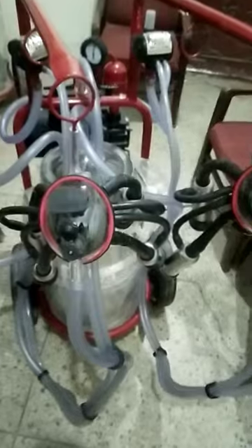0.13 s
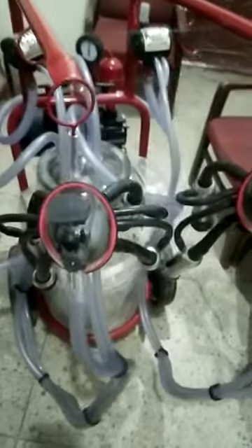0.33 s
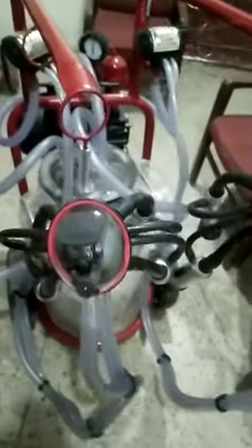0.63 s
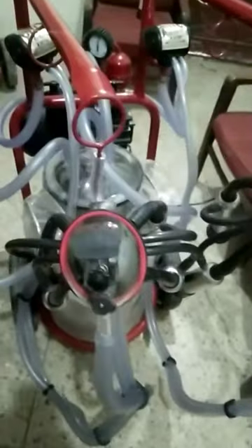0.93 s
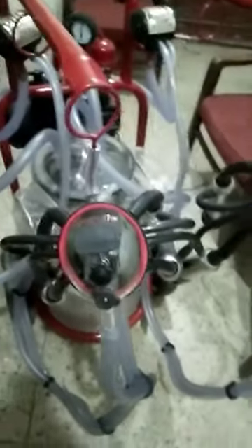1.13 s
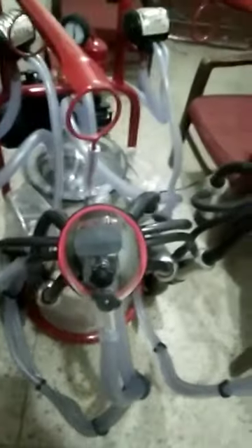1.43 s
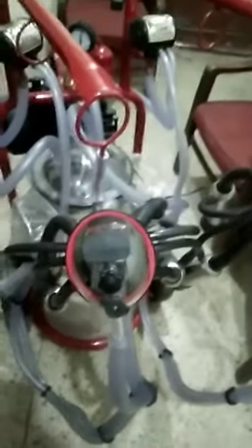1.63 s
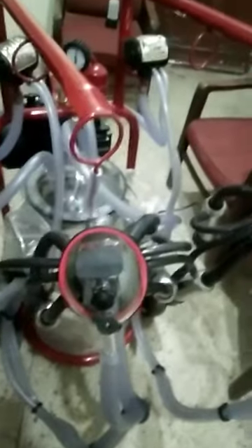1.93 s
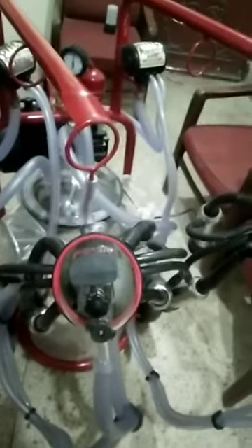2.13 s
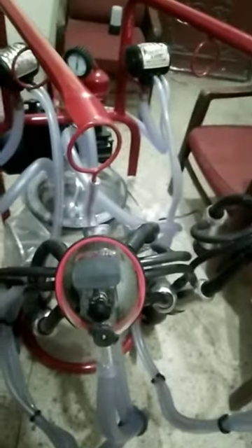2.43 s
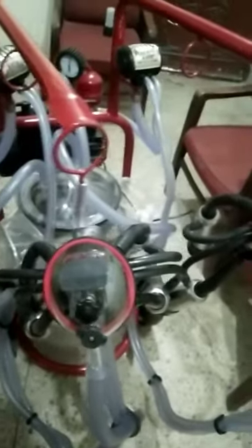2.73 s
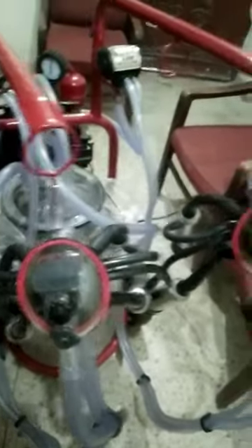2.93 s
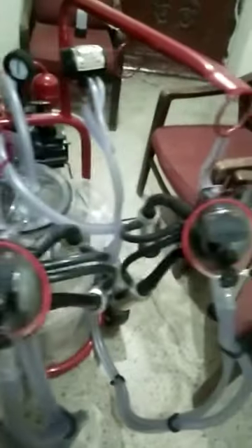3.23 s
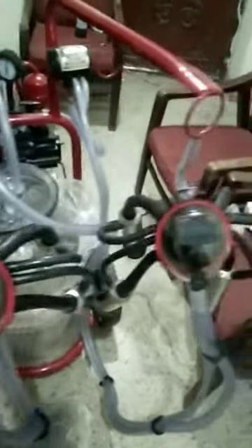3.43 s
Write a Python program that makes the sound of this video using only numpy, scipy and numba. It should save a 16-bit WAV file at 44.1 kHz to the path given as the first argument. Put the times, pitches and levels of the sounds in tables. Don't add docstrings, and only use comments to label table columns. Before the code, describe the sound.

A milking machine's vacuum pump drones with a rough, fast throb and steady air hiss, while two pulsators clack out of step, each followed by a breathy puff, close to a phone in a hard-floored room.

```python
import sys
import numpy as np
from scipy import signal
from scipy.io import wavfile
from scipy.ndimage import uniform_filter1d, minimum_filter1d
from numba import njit

SR = 44100
rng = np.random.default_rng(int(sys.argv[2]) if len(sys.argv) > 2 else 0)


def convert_level_to_amplitude(level_db):
    exponent = np.asarray(level_db, float) / 20
    return 10 ** exponent


def materialize(psi):
    bounded = np.clip(np.atleast_2d(psi).T, -1, 1)
    quanta = np.round(bounded * 32767).astype(np.int16)
    wavfile.write(sys.argv[1], SR, quanta)


N = 158319
T = np.arange(N) / SR


def level(x, db):
    return x * convert_level_to_amplitude(db) / np.sqrt(np.mean(x ** 2))


def band(x, hz, width):
    return signal.lfilter(*signal.iirpeak(hz, hz / width, SR), x)


def ring(x, hz, width, outer_width):
    return band(band(x, hz, width), hz, outer_width)


def noise():
    return rng.standard_normal(N)


def walk(rate):
    hold = int(SR / rate)
    steps = np.repeat(rng.standard_normal(N // hold + 1), hold)
    return 1.3 * uniform_filter1d(uniform_filter1d(steps, hold), hold)[:N]


def curve(points):
    return np.interp(T, *np.array(points).T)


# multiple of the shaft speed, level in dB.
SHAFT_MULTIPLES = [(1, -43), (2, -38.5), (3, -36.5), (4, -8.5), (5, -28.5), (6, -23.5), (7, -22), (8, -9),
                   (9, -16.5), (10, -18.5), (11, -16.5), (12, -5), (13, -17), (14, -21.5), (15, -37.5),
                   (16, 2), (17, -27.5), (18, -11.5), (19, -18.5), (20, -3.5), (21, -36.5), (22, -23),
                   (23, -24.5), (24, -29), (25, -29), (26, -49), (27, -43), (28, -17), (29, -31.5),
                   (30, -80)]
# time in seconds, tilt in dB.
STANDING_WAVE_TILT = [
    (.2, -2.5),
    (.65, -1),
    (1.1, 0),
    (1.6, 1.5),
    (2.6, 1.5),
    (3.1, 1),
    (3.3, 0),
    (3.59, -1.5),
]
# pitch in Hz, width in Hz, level in dB.
CASING_RINGS = [(620, 50, -3), (880, 220, -13), (1057, 50, 3.5), (1108, 80, -3.5), (1355.5, 65, -1.5),
                (1511, 20, 1)]


def pump():
    shaft_hz, stroke_s = 23.766, .0116
    vanes, main = 4, 16
    turn = 2 * np.pi * shaft_hz * (T - stroke_s)
    tilt = curve(STANDING_WAVE_TILT)
    throb = 0
    for k, db in list(SHAFT_MULTIPLES) + [(2 * main, -18.5)]:
        lag = 1.6 * (k % vanes > 0 and k < main - vanes)
        tilted = abs(k - main) <= vanes + 1 or k > main + vanes
        lean = tilt * np.sign(k - main) * tilted
        throb = throb - convert_level_to_amplitude(db + lean + 0.8 * walk(2.17)) * np.cos(k * turn - lag)

    size = int(SR / shaft_hz)
    place = turn / (2 * np.pi) % 1 * size
    each_turn = np.interp(place, np.arange(size), rng.standard_normal(size))
    shake = each_turn + 0.72 * noise()
    clatter = 0
    for hz, width, db in CASING_RINGS:
        clatter = clatter + convert_level_to_amplitude(db + 0.55 * walk(4.02)) * ring(shake, hz, width, 2 * width)
    return level(throb, -20.5) + level(clatter, -42.5)


# pitch in Hz, level in dB per Hz.
HISS_TONE = [(470, -36), (800, -25.5), (1210, -15), (1500, -9.5), (1610, -13.5), (2210, -5.5), (5240, -5),
             (8120, -12.5), (16000, -47)]


def air():
    hz, db = np.array(HISS_TONE).T
    hiss = 0
    for f in 900 * 2 ** (np.arange(13) / 3):
        tone_db = np.interp(np.log(f), np.log(hz), db)
        hiss = hiss + convert_level_to_amplitude(tone_db + 2.6 * walk(9.22)) * ring(noise(), f, f / 3, f / 2)
    rumble = ring(noise(), 314, 595, 680)
    deep = ring(noise(), 40, 40, 50)
    return level(hiss, -34) + level(rumble, -37) + level(deep, -59)


# start in seconds, peak level in dB, low ring against high ring in dB, rattle level in dB.
VALVE_CLAPS = [(0.4953, -3.5, -2.5, -15), (0.5671, -3.5, -0.5, -11.5), (0.9647, -11, 1.5, -9.5),
               (1.0794, -9, 0.5, -3), (1.3992, -5.5, -3, -6.5), (1.6003, -4.5, -2, -7.5),
               (1.8687, -7.5, -0.5, -7), (2.1141, -9.5, 7.5, -6.5), (2.3032, -5, -4, -8.5),
               (2.6349, -3.5, -0.5, -10), (2.7721, -9.5, 1, -6.5), (3.1477, -9.5, 2.5, 1),
               (3.2066, -7.5, 0, -8)]
FIRST_CLAP = (.05, -5, 5, 5)
# pitch in Hz, width in Hz, level in dB.
HOUSING_RINGS = [(2233, 225, -14), (2755, 170, -13.5), (2852, 55, -5), (3005, 88, 1.5), (3252, 136, -5.5),
                 (3460, 260, -7), (3863, 164, -4), (4005, 120, 2), (4246, 410, -6.5), (5200, 1100, -5.5),
                 (5860, 520, -16.5), (7900, 630, -15.5), (10200, 5200, -22)]


def valves():
    split_hz, edge_hz = 3400, 4800
    knock_s, rattle_s, tail_s = 0.0037, 0.024, 0.058
    out, n = np.zeros(N), int(.4 * SR)
    t = np.arange(n) / SR
    strike = convert_level_to_amplitude(20.5) * (t == 0)
    shiver = np.exp(-t / rattle_s) + convert_level_to_amplitude(-7) * np.exp(-t / tail_s)
    for start, peak_db, low_db, rattle_db in [FIRST_CLAP] + list(VALVE_CLAPS):
        luck = rng.standard_normal(len(HOUSING_RINGS))
        grit = rng.standard_normal(n)
        knock = strike + convert_level_to_amplitude(-1) * np.exp(-t / knock_s) * grit
        rattle = convert_level_to_amplitude(rattle_db) * shiver * grit
        mostly_rattle = convert_level_to_amplitude(-7) * knock + rattle
        mostly_knock = knock + convert_level_to_amplitude(-5) * rattle
        hit = 0
        for (hz, width, db), chance in zip(HOUSING_RINGS, luck):
            push = mostly_knock if split_hz < hz < edge_hz else mostly_rattle
            gain = convert_level_to_amplitude(db + 1.46 * chance + low_db * (hz < split_hz)) / np.sqrt(width)
            hit = hit + gain * ring(push, hz, width, 4 * width)
        i = int(start * SR)
        out[i:i + n] += convert_level_to_amplitude(peak_db) * hit[:N - i] / np.abs(hit).max()
    return out


# time of the peak in seconds, level in dB, extra treble in dB.
AIR_RUSHES = [(.28, -30, 6.5), (.33, -30.5, 0), (.73, -31.5, 3), (0.839, -28, -1), (1.18, -30, 4),
              (1.36, -28.5, -3), (1.63, -31, 2.5), (1.87, -30, -3), (2.098, -28, 1), (2.39, -28.5, -6),
              (2.53, -30.5, 2), (2.9, -29, -2.5), (2.99, -29, 3), (3.22, -38, 0), (3.429, -25, -3)]
# pitch in Hz, width in Hz, level in dB.
INLET_RINGS = [(3090, 190, -9.5), (4003, 250, -4.5), (4520, 200, 0.5), (4976, 310, -5.5), (5395, 260, -1),
               (5950, 340, -3.5), (7000, 2600, -2.5), (7860, 540, -13), (9150, 2100, -9.5),
               (14000, 4000, -21)]


def puffs():
    rise_s, fall_s = 0.032, 0.039
    body, treble = 0, 0
    for peak_s, db, treble_db in AIR_RUSHES:
        swell = np.exp(-((T - peak_s) / np.where(T < peak_s, rise_s, fall_s)) ** 2)
        body = body + convert_level_to_amplitude(db) * swell
        treble = treble + convert_level_to_amplitude(db + treble_db) * swell
    out = 0
    for hz, width, db in INLET_RINGS:
        swells = treble if hz > 7500 else body
        flutter = convert_level_to_amplitude(db - 6 + 2.95 * walk(25))
        out = out + swells * flutter * level(ring(noise(), hz, width, 2 * width), 0)
    return out


@njit
def walls(x, lags, gain, damp):
    line, soft, out = np.zeros((8, 4096)), np.zeros(8), np.zeros(len(x))
    for i in range(len(x)):
        total = 0.
        for k in range(8):
            soft[k] += (1 - damp) * (gain[k] * line[k, (i - lags[k]) & 4095] - soft[k])
            total += soft[k]
            out[i] += soft[k] * (1 - 2 * (k % 2))
        for k in range(8):
            line[k, i & 4095] = x[i] + soft[k] - total / 4
    return out


def scene():
    claps = valves()
    near = claps + puffs()
    lags = np.array([701, 887, 1093, 1327, 1597, 1871, 2203, 2579])
    fade_s = 0.4
    room = walls(near, lags, convert_level_to_amplitude(-60 * lags / SR / fade_s), 0.15)
    mid = near + convert_level_to_amplitude(-11.5) * room + pump() + air()
    high_pass = signal.butter(8, 5000, "high", fs=SR, output="sos")
    side = convert_level_to_amplitude(-23.5) * signal.sosfiltfilt(high_pass, claps)
    return np.array([mid + side, mid - side])


# time in seconds, bass gain in dB.
BASS_RETURN = [
    (.13, -10),
    (.37, -9),
    (.42, -4.5),
    (.9, -0.5),
    (1.5, -1),
]


def bass_cut(x):
    bass = signal.filtfilt(*signal.butter(2, 233, fs=SR), x)
    return x + (convert_level_to_amplitude(curve(BASS_RETURN)) - 1) * bass


# time in seconds, gain in dB.
GAIN_SETTLING = [
    (.13, -10),
    (.2, -5),
    (.26, -1),
    (.31, 2),
    (.6, 2),
    (1., 1.5),
]


def wake_up(x):
    start_s, fade_s = .132, 0.0056
    return x * convert_level_to_amplitude(curve(GAIN_SETTLING)) * np.clip((T - start_s) / fade_s, 0, 1)


def limiter(x):
    limit_db, release_s = -3.5, 0.027
    k = int(release_s * SR)
    loudest = np.abs(x).max(axis=0) + 1e-9
    gain = minimum_filter1d(np.minimum(1, convert_level_to_amplitude(limit_db) / loudest), k)
    return x * uniform_filter1d(gain, k)


def band_limit(x):
    return signal.sosfilt(signal.butter(12, 15850, fs=SR, output="sos"), x)


def record(dry):
    x = bass_cut(dry)
    x = signal.lfilter(*signal.butter(2, 13500, fs=SR), x)
    mix = limiter(wake_up(x))
    return band_limit(mix)


dry = scene()
out = record(dry)
materialize(out)
```